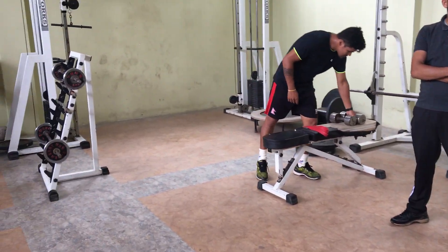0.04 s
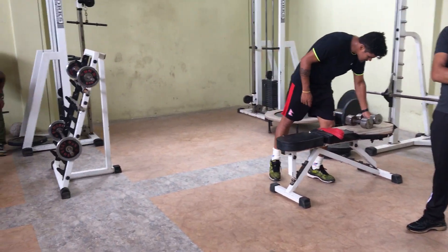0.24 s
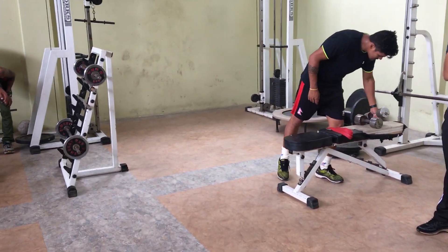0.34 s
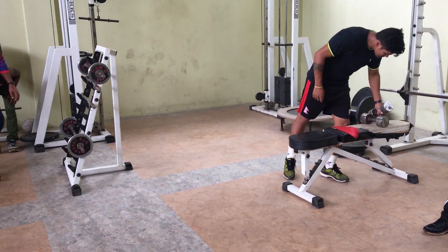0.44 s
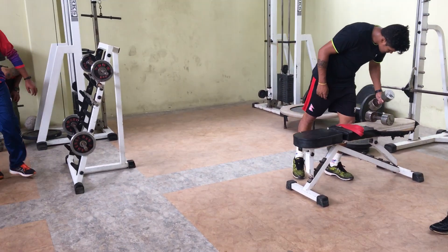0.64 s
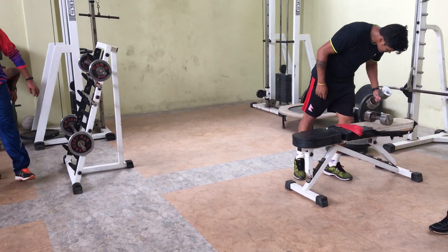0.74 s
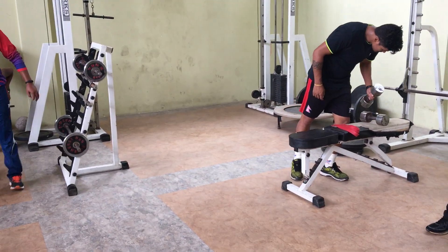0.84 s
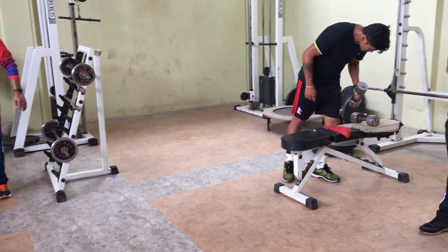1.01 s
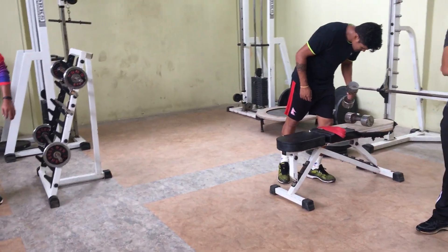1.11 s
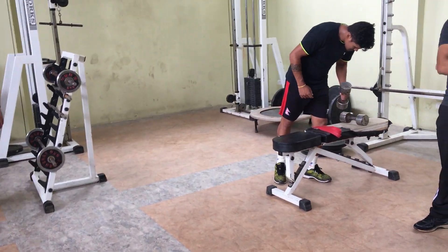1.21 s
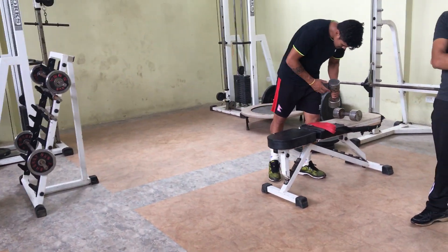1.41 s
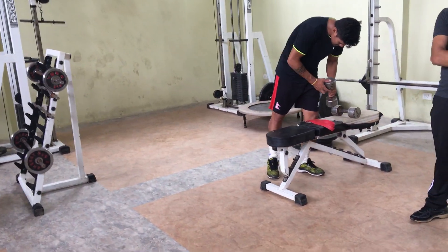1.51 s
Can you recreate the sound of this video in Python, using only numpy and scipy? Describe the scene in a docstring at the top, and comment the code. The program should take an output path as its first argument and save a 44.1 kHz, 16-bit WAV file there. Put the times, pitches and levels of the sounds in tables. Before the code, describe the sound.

A dumbbell clanks down once among other weights, a sharp metal tick with a short thump and tiny rattle, then a long echo fades in a bare gym, heard from a few metres away.

```python
"""A large, bare gym: an iron dumbbell is set down among others, a few metres from the microphone.
It touches, lands with a thump and a hard metal tick, rocks twice and settles softly.
Damped modes make the blows, filtered impulses the ticks, and decaying noise the hall's long echoes.
Later, soft scuffs of swelling hiss and a faint high ring of narrow-band noise are heard.
Dull coloured noise is the air of the room."""
import sys
import numpy as np
from scipy import signal
from scipy.fft import rfft, irfft, next_fast_len
from scipy.io import wavfile

SR = 44100
rng = np.random.default_rng(int(sys.argv[2]) if len(sys.argv) > 2 else 0)


def digitize_waveform(pressure):
    """Quantize a signal to 16-bit integers and store it at the path in sys.argv[1].

    Rows of a 2-D input are taken as channels; values are limited to [-1, 1].
    """
    field = np.atleast_2d(pressure).T
    bounded = np.clip(field, -1, 1)
    quanta = np.round(bounded * 32767).astype(np.int16)
    wavfile.write(sys.argv[1], SR, quanta)


N = 68355  # length [samples]


def undb(db):
    """Decibels to gain."""
    return 10 ** (np.asarray(db) / 20)


def unit(x):
    """Scale to rms 1."""
    return x / np.sqrt(np.mean(x ** 2))


def since(start):
    """Seconds since a moment, zero before it."""
    return np.maximum(np.arange(N) / SR - start, 0)


def fade(start, t60, rise):
    """Quick rise, then exponential decay by 60 dB in t60 seconds."""
    age = since(start)
    return (1 - np.exp(-age / rise)) * np.exp(-np.log(1000) * age / t60)


def on_log(hz, points, values):
    """Join points by straight lines on a log-frequency axis."""
    return np.interp(np.log(np.maximum(hz, 1)), np.log(points), values)


def colour(x, table):
    """Causal, minimum-phase filter with the given outline (frequency [Hz], level [dB])."""
    size = 2 * N
    points, levels = np.array(table).T
    hz = np.arange(N + 1) * SR / size
    gain = undb(on_log(hz, points, levels))
    # folding the cepstrum onto positive times makes the filter causal
    cepstrum = irfft(np.log(gain))
    cepstrum[1:N] *= 2
    cepstrum[N + 1:] = 0
    response = np.exp(rfft(cepstrum))
    return irfft(rfft(x, size) * response)[:N]


def noise(table):
    """Coloured noise of rms 1."""
    return unit(colour(rng.standard_normal(N), table))


CONTACT_RISE_S = 0.00062  # time constant for a contact to build up


def ring(start, modes):
    """Decaying sine modes struck at one moment."""
    age = since(start)
    total = 0
    for hz, db, t60 in modes:
        total = total + undb(db) * fade(start, t60, CONTACT_RISE_S) * np.sin(2 * np.pi * hz * age)
    return total


# spectrum of the dull room air: (frequency [Hz], relative level per Hz [dB])
AIR_COLOUR = [(30, -32), (45, 8.5), (66, 1), (99, -8), (200, -10), (400, -12), (650, -16.5), (920, -11),
              (1300, -17), (1900, -17), (2770, -22.5), (4000, -28), (5200, -33.5), (9500, -38.5),
              (10500, -43), (15500, -44)]
# slow drift of the room air: (time [s], level [dB])
AIR_LEVEL = [(0, -46.5), (.2, -51.5), (1.0, -50.5), (1.55, -52.5)]


def air():
    """Dull room noise whose level drifts a little."""
    times, levels = np.array(AIR_LEVEL).T
    return undb(np.interp(since(0), times, levels)) * noise(AIR_COLOUR)


# echoes of the hall: (frequency [Hz], level against the direct sound [dB], t60 [s])
HALL = [(62, 5.5, 2.95), (122.8, 3.5, 4.16), (234, 5.5, 2.7), (520, 12, 2.58), (1022, -0.5, 2.22),
        (2050, 4, 1.81), (4320, 6.5, 1.58), (7950, -4.5, 1.17), (16100, 0, 0.71)]
HALL_DELAY_S, HALL_BUILD_S = 0.00039, 0.0021
EARLY_DB, EARLY_T60_S = -4, 0.49


def hall(sounds):
    """Dense echoes off bare walls, a new pattern for each sound: strong early ones, then a long
    tail whose treble dies first."""
    size = next_fast_len(2 * N, True)
    hz = np.arange(size // 2 + 1) * SR / size
    centres = np.array(HALL)[:, 0]
    white = rfft(rng.standard_normal((len(sounds), size)))
    early = undb(EARLY_DB) * fade(HALL_DELAY_S, EARLY_T60_S, HALL_BUILD_S)
    echoes = 0
    # each band is a triangle on the log-frequency axis, crossfading into its neighbours
    for (_, db, t60), band in zip(HALL, np.eye(len(HALL))):
        late = fade(HALL_DELAY_S, t60, HALL_BUILD_S)
        shape = np.hypot(late, early)
        band_noise = irfft(white * on_log(hz, centres, band), size)[:, :N]
        echoes = echoes + undb(db) * band_noise * shape / np.linalg.norm(shape)
    return signal.fftconvolve(sounds, echoes, axes=1)[:, :N].sum(axis=0)


SLIDE_START_S, SLIDE_RISE_S = 1.2, 0.13
SLIDE_HZ, SLIDE_WIDTH_HZ, SLIDE_DB = 3480, 160, -67


def slide():
    """A narrow metal resonance, rubbed faintly into ringing."""
    b, a = signal.iirpeak(SLIDE_HZ, SLIDE_HZ / SLIDE_WIDTH_HZ, fs=SR)
    resonance = unit(signal.lfilter(b, a, rng.standard_normal(N)))
    swell = np.minimum(since(SLIDE_START_S) / SLIDE_RISE_S, 1)
    return undb(SLIDE_DB) * swell * resonance


# soft scuffs of cloth or shoe: (time [s], length [s], level [dB])
SCUFFS = [(0.996, 0.059, -86), (1.131, 0.037, -67), (1.16, 0.13, -62.5), (1.423, .04, -71)]
# spectrum of the scuffing hiss: (frequency [Hz], relative level [dB])
SCUFF_COLOUR = [(1000, -15), (3000, -7.5), (6000, -10), (9000, -11), (13000, -15.5), (15500, -22)]


def scuffs():
    """Short half-sine swells of rubbing hiss."""
    swell = 0
    for start, length, db in SCUFFS:
        swell = swell + undb(db) * np.sin(np.pi * np.minimum(since(start) / length, 1))
    return swell * noise(SCUFF_COLOUR)


# thin rings that outlast the blow: (frequency [Hz], level [dB], t60 [s])
RINGS = [(198, -38, 1.9), (283, -30, 1.6), (490, -35, 1.0), (562, -36, 1.2), (634, -38, 1.4),
         (742, -41, 1.4), (997, -36, 1.1), (1116, -40, 1.1), (1485, -46, .7), (3079, -58, .7),
         (9276, -56, .5)]


def lingering_rings():
    """Weakly damped modes, struck as the dumbbell lands, ring on thinly."""
    landing_s = BLOWS[2][0]
    return ring(landing_s, RINGS)


# the support gives under the weight: (frequency [Hz], relative level [dB], t60 [s])
THUMP = [(116, -33, 0.022), (205.4, -6, 0.033), (264, -3, 0.02)]
# damped modes of the iron heads and support: (frequency [Hz], relative level [dB], t60 [s])
CLANK = [(474, -16, 0.017), (670, -10, 0.011), (783, -6, 0.012), (954, 4, 0.01), (1102, 0.5, 0.012),
         (1370, -5, 0.0047)]
# colour of the metal-on-metal tick: (frequency [Hz], relative level [dB])
TICK_COLOUR = [(500, -13.5), (1500, -7.5), (2000, -2), (2700, 4.5), (4000, -2.5), (5200, -7.5),
               (6700, -1.5), (8900, 4.5), (10600, -5), (15500, -10.5)]
# brief bright modes that the tick excites: (frequency [Hz], relative level [dB], t60 [s])
PING = [(1424, -18, 0.014), (2657, -24.5, .01), (3070, -28, 0.0083), (6570, -23.5, 0.0073),
        (8560, -21.5, 0.0067)]
TICK_DB = 4  # click against its pings


def contact(start, thump_db, clank_db, tick_db):
    """One contact thumps the support, clanks the iron and gives a sharp, pinging tick."""
    click = colour(signal.unit_impulse(N, int(start * SR)), TICK_COLOUR)
    tick = undb(TICK_DB) * click + ring(start, PING)
    thump = undb(thump_db) * ring(start, THUMP)
    clank = undb(clank_db) * ring(start, CLANK)
    return thump - clank + undb(tick_db) * tick


# contacts of the dumbbell: (time [s], thump level [dB], clank level [dB], tick level [dB])
BLOWS = [(0.243, -30, -19.5, -65), (.2458, -13, -18, -60), (0.2494, -6, -17.5, 1), (0.2591, -17.5, -5, -12),
         (0.2658, -17, -12, -23), (.349, -16.5, -17, -50)]


def dumbbell():
    """Successive contacts as the iron touches, lands, rocks and settles."""
    return [contact(*blow) for blow in BLOWS]


def scene():
    """The contacts and scuffs in the hall, the lingering rings, the faint slide and the room's air."""
    sounds = np.array(dumbbell() + [scuffs()])
    direct = sounds.sum(axis=0)
    mix = direct + hall(sounds) + lingering_rings() + slide() + air()
    return mix[None]


LOW_CUT_HZ, TOP_HZ = 60.4, 15750


def record(dry):
    """The microphone drops the deep bass and cuts the top steeply."""
    low_cut = signal.butter(4, LOW_CUT_HZ, "high", fs=SR, output="sos")
    top_cut = signal.ellip(10, .2, 80, TOP_HZ, fs=SR, output="sos")  # 0.2 dB ripple, 80 dB stop
    return signal.sosfilt(top_cut, signal.sosfilt(low_cut, dry))


dry = scene()
out = record(dry)
digitize_waveform(out)
```